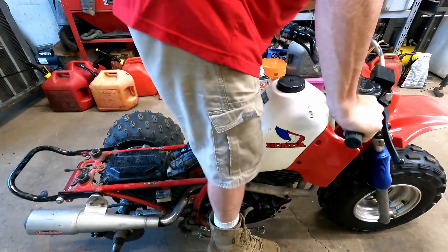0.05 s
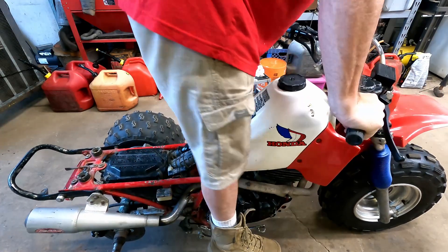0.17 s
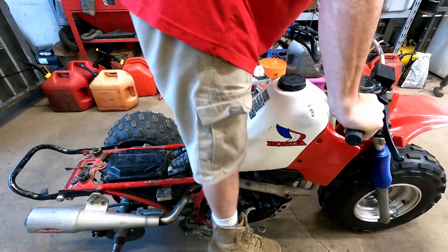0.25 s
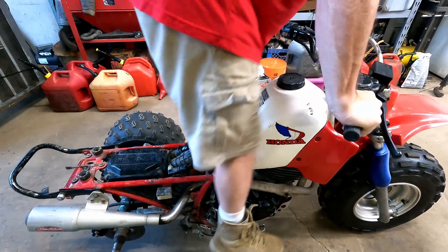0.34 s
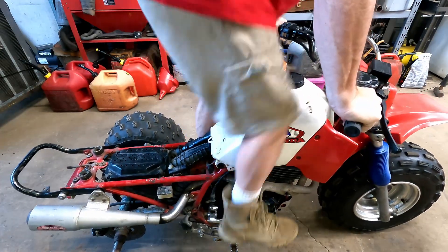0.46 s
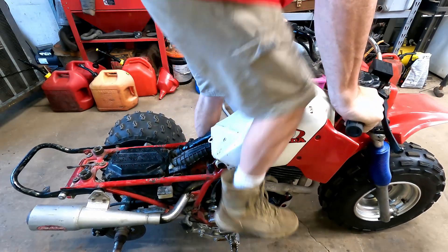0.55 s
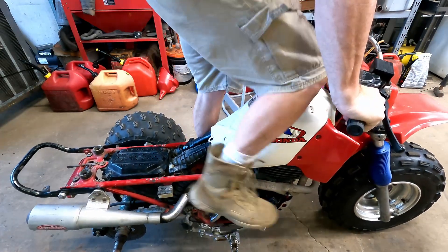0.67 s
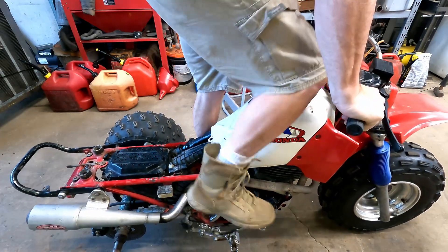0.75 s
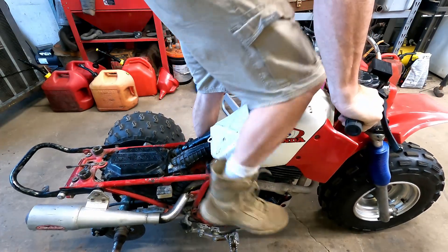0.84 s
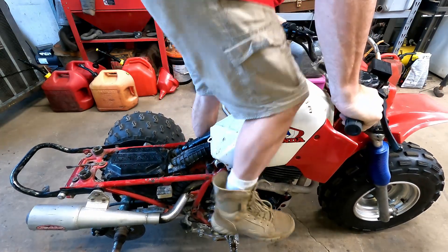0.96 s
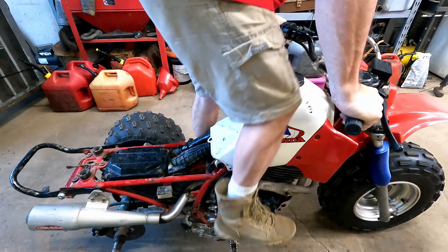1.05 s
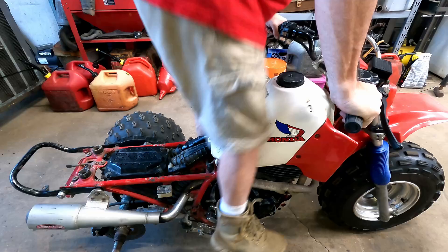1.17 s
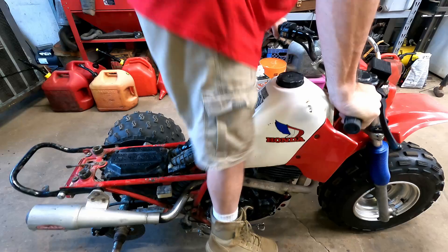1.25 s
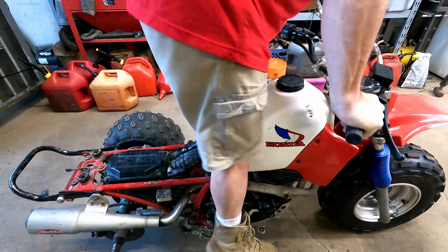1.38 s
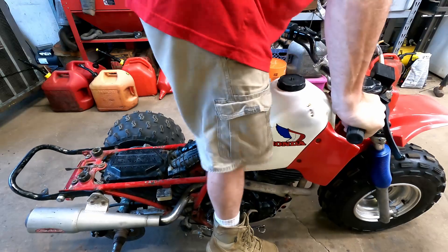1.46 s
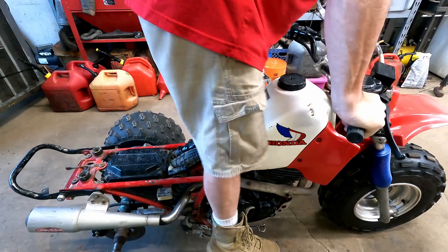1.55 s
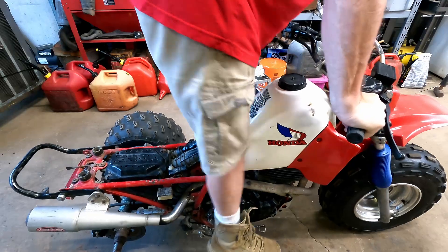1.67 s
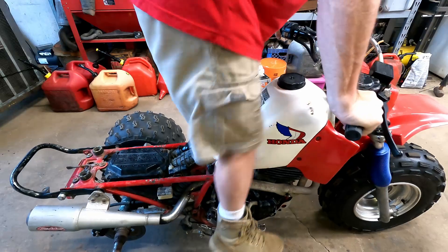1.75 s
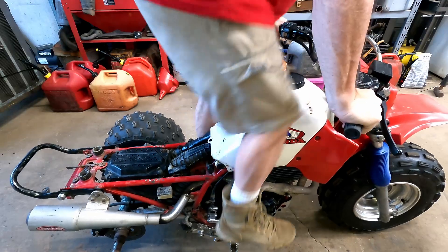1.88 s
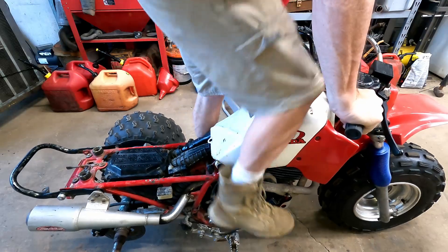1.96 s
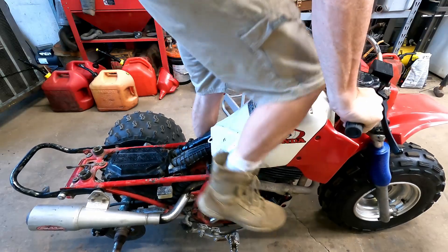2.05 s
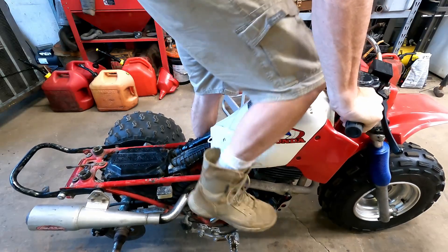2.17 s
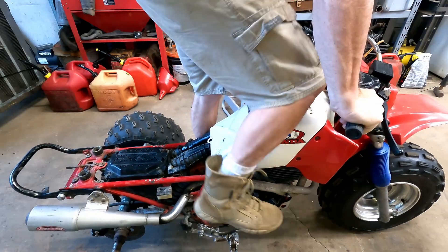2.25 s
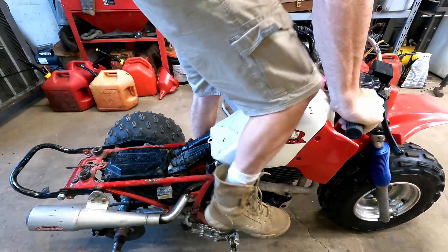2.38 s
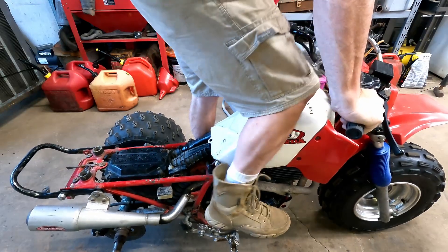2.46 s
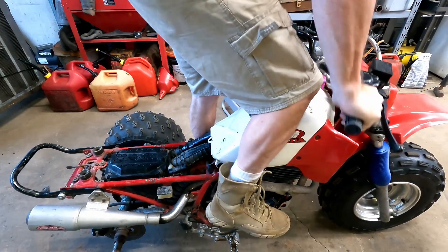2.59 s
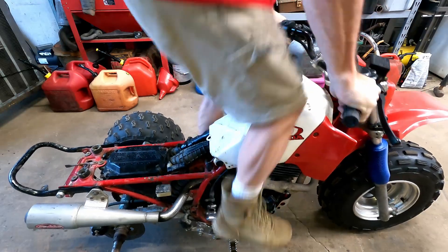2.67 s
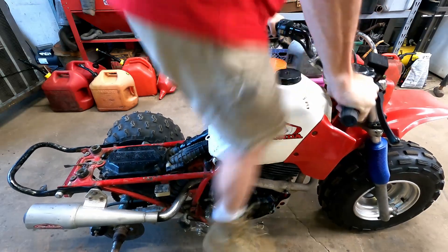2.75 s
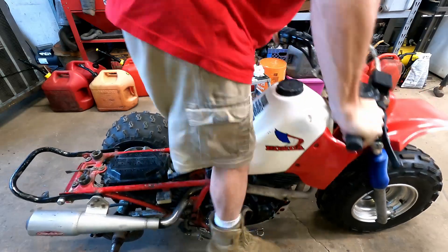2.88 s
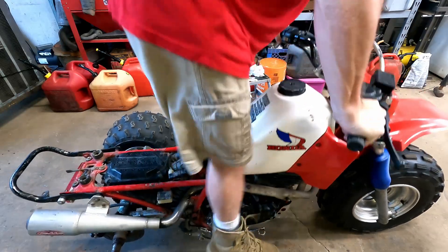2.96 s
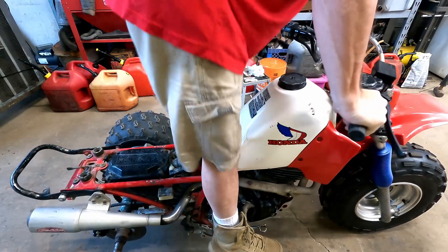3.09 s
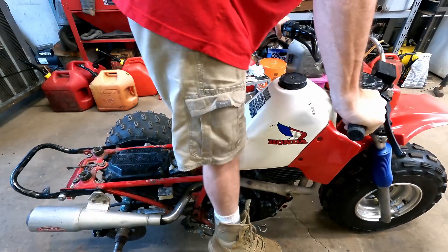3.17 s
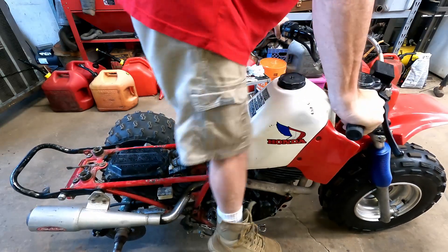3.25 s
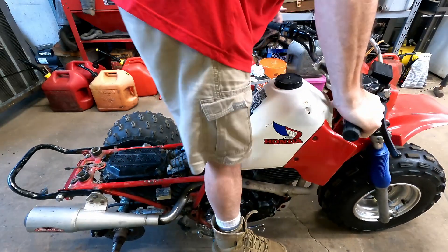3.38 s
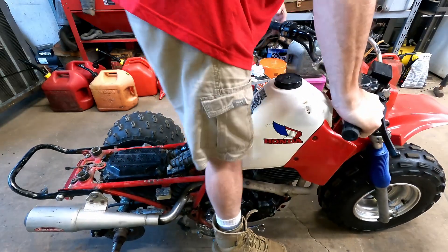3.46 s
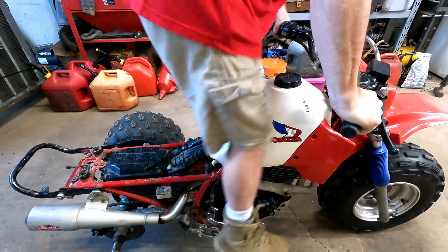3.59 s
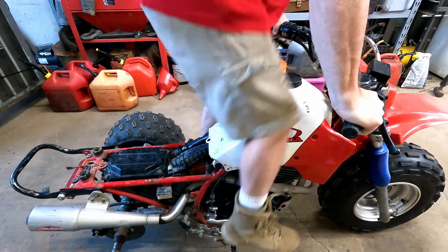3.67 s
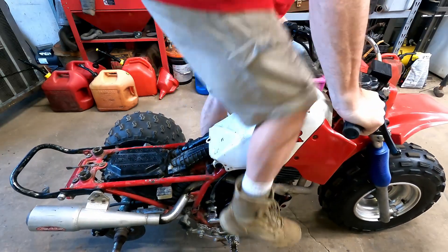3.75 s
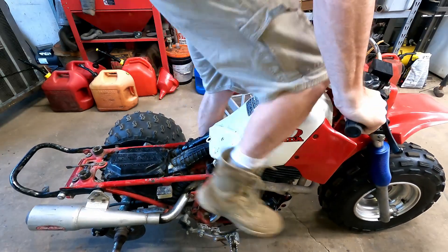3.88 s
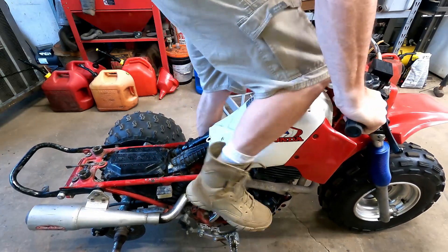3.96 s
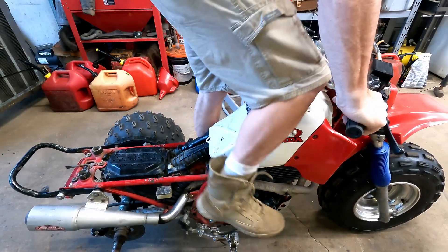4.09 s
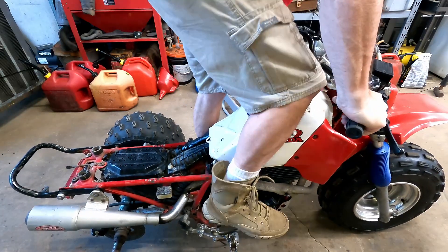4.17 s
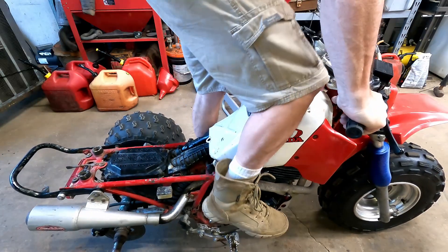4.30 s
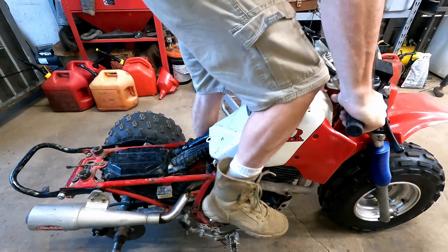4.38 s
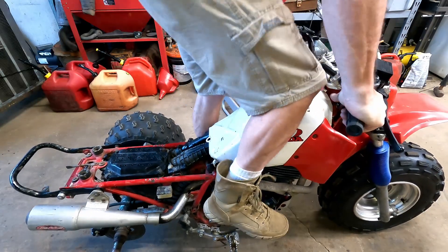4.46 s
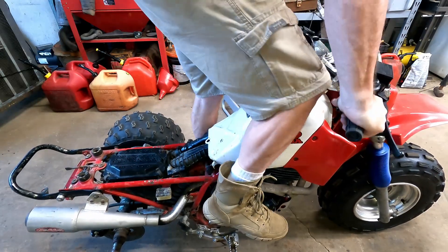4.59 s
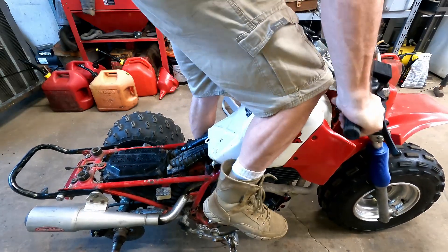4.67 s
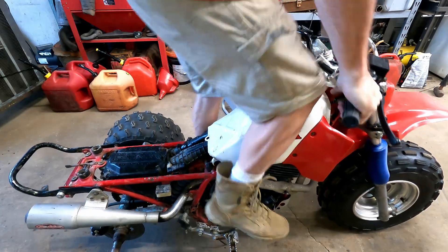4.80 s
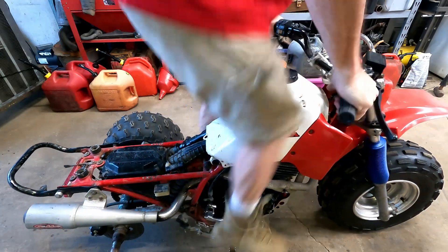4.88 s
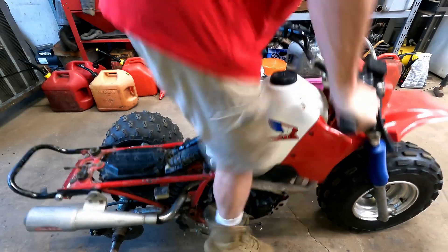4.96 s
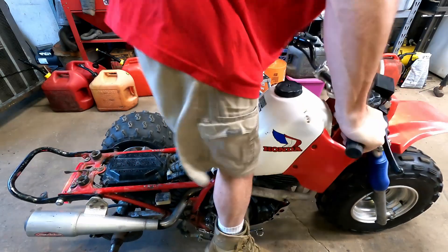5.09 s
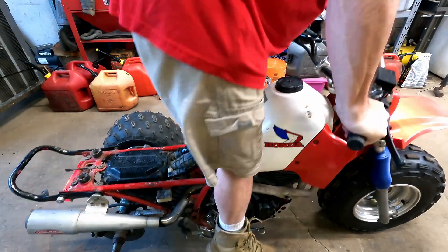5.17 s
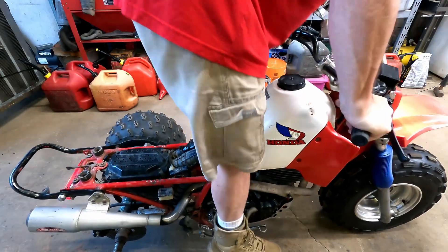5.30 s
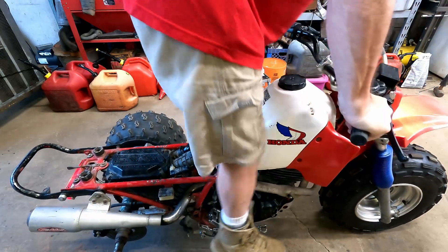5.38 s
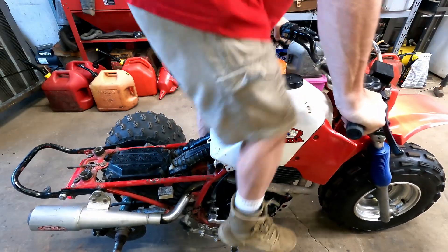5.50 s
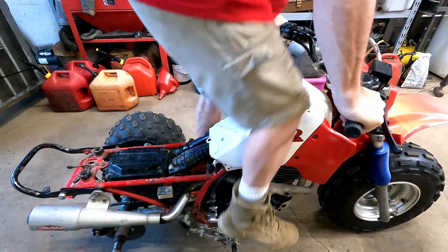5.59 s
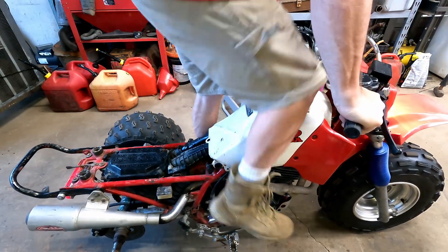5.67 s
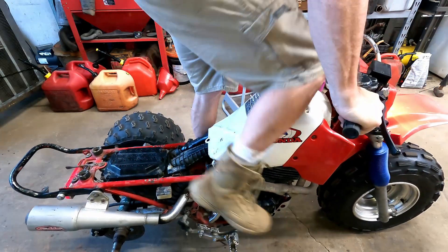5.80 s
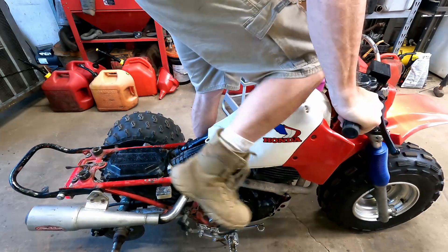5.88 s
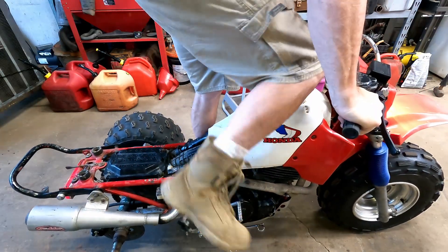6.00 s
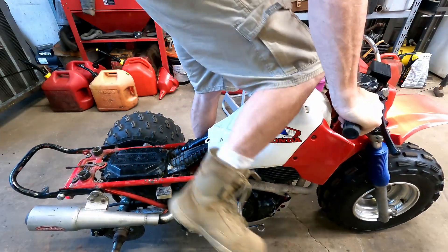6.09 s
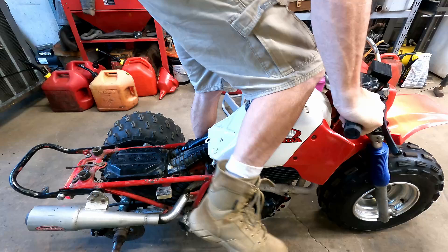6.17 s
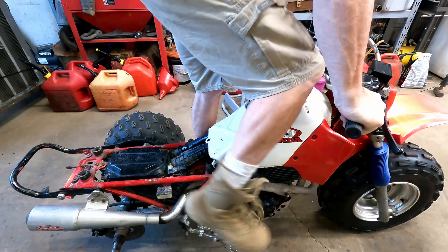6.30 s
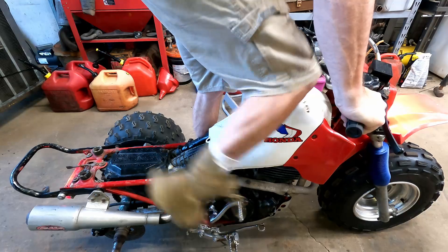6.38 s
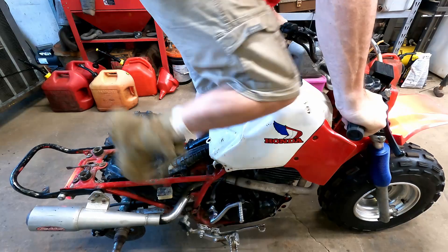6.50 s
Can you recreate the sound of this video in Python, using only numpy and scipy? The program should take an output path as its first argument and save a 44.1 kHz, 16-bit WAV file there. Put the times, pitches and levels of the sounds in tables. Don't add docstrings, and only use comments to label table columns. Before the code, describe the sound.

Close up in a hard, echoing shop, a kick lever clicks back over its ratchet, clanks under a boot and whirrs the gears. Two kicks give only dull air gulps and sharp metal smacks. A bird whistles faintly outside. The third kick smacks, coughs and catches, and the single-cylinder exhaust pops in a quick, booming, raspy beat to the end.

```python
import sys
import numpy as np
from scipy import signal
from scipy.fft import rfft, irfft, next_fast_len
from scipy.io import wavfile
from scipy.ndimage import uniform_filter1d

SR = 44100
rng = np.random.default_rng(int(sys.argv[2]) if len(sys.argv) > 2 else 0)


def unload_wav(signal):
    wavfile.write(
        sys.argv[1],
        SR,
        np.round(np.clip(np.atleast_2d(signal).T, -1, 1) * 32767).astype(np.int16),
    )


def attenuation_scalar(level_db):
    decades = np.asarray(level_db, float) / 20
    return 10 ** decades


N = 288444

# start in seconds, boom in dB, pulse width in ms.
GULPS = [
    (1.181, -8.5, 2.2),
    (2.712, -13, 2.2),
    (2.7473, 5.5, 1.5),
    (4.863, -13, 2.2),
    (4.8984, 5.5, 1.5),
    (5.1039, 3, 1.5),
    (5.1856, -2.5, 1.7),
]
FIRING_S = [5.0331, 5.2856, 5.3945, 5.5012, 5.6183, 5.7298, 5.8491, 5.9637, 6.0693, 6.1718, 6.2635, 6.3505,
            6.4341, 6.5135]
# pitch in Hz, level in dB, time to die by 60 dB in seconds.
PAWL = [(7000, -3, .006), (7680, -2, .009), (8500, -1, .006), (9000, -2, .007), (9700, -3, .006),
        (10600, -5, .005), (11700, -8, .007)]
# frequency in Hz, level in dB per Hz.
GEARS = [(180, -13.5), (300, 3), (360, -3.5), (440, -1.5), (614, -20.5), (689, -12), (1610, -16.5),
         (2140, -18), (2930, -18), (9240, -14.5), (16000, -25)]
# time in seconds, level in dB.
LOAD = [(4.8, -53), (4.9, -25), (5.3, -27), (5.9, -31.5), (6.3, -23), (6.54, -27.5)]


def rms_one(x):
    return x / np.sqrt(np.mean(x ** 2) + 1e-20)


def at_hz(points, hz):
    table = np.array(points)
    return np.interp(np.log(hz + 1), np.log(table[:, 0]), table[:, 1])


def in_time(rows, column):
    return np.interp(np.arange(N) / SR, np.array(rows)[:, 0], np.array(rows)[:, column])


def level(rows):
    start, end = rows[0][0], rows[-1][0]
    inside = np.interp(np.arange(N) / SR, [start - .01, start, end, end + .01], [0, 1, 1, 0])
    return inside * attenuation_scalar(in_time(rows, column=-1))


def coloured(x, points):
    size = next_fast_len(N)
    return irfft(rfft(x, size) * attenuation_scalar(at_hz(points, np.fft.rfftfreq(size, 1 / SR))), size)[:N]


def band(x, low_hz, high_hz):
    return signal.sosfilt(signal.butter(2, [low_hz, high_hz], "band", fs=SR, output="sos"), x)


def clicks(times, gains):
    out = np.full(N, 1e-18)
    np.add.at(out, np.minimum((np.asarray(times) * SR).astype(int), N - 1), gains)
    return out


def dying(x, t60, rise_ms=0.0):
    keep = np.exp(-1000 / (rise_ms * SR + 1e-9))
    decay = signal.lfilter([1], [1, -attenuation_scalar(-60 / (t60 * SR))], x)
    return signal.lfilter([1 - keep], [1, -keep], decay)


def ring(x, hz, t60):
    r, w = attenuation_scalar(-60 / (t60 * SR)), 2 * np.pi * hz / SR
    return signal.lfilter([0, np.sin(w)], [1, -2 * r * np.cos(w), r * r], x)


def struck(times, db, modes, contact_t60):
    own_db = rng.normal(0, 4, (len(times), len(modes)))
    rattle = rng.standard_normal(N)
    total = 0
    for k, (hz, mode_db, t60) in enumerate(modes):
        contact = dying(clicks(times, attenuation_scalar(db + mode_db + own_db[:, k])), contact_t60, rise_ms=0.2)
        total = total + ring(rattle * contact, hz, t60)
    return total


def pulses(times, gains, widths_ms):
    out, ms = np.zeros(N + 800), np.arange(-400, 400) * 1000 / SR
    for s, gain, width in zip(times, gains, widths_ms):
        out[round(s * SR):round(s * SR) + 800] += gain / width * np.exp(-.5 * (ms / width) ** 2)
    return out[400:N + 400]


def firings():
    throttle_s = (5.85, 6.21)
    s = np.array(FIRING_S)
    throttle, first = np.interp(s, throttle_s, [0, 1]), s == s[0]
    boom_db = 4.5 * first
    width_ms = .72 + (.6 - .72) * throttle
    rasp_db = -28 + (-18.5 + 28) * throttle + 9.5 * first
    crack_db = -17.5 + 0.5 * np.sin(np.pi * throttle) + 5.5 * first
    return s, boom_db, width_ms, rasp_db, crack_db


def pipe(gas):
    # delay in ms, gain.
    bounces = [(0, .375), (1.5, .08), (7.2, .14), (11.5, -.41), (13.5, -.19), (17.1, .19), (22.2, .19),
               (31.8, -.1), (37.7, .17), (52.8, .06), (63.5, .06)]
    # pitch in Hz, level in dB, time to die by 60 dB in seconds, push or pull (1 or -1).
    booms = [(56, -16.7, .142, -1), (72, -25.6, .144, -1), (65, -13.8, .048, 1)]
    taps = clicks([ms / 1000 for ms, gain in bounces], [gain for ms, gain in bounces])[:4000]
    direct = signal.fftconvolve(gas, taps)[:N]
    low = sum(sign * attenuation_scalar(db) * ring(gas, hz, t60) for hz, db, t60, sign in booms)
    return direct + low * attenuation_scalar(-20)


def exhaust_boom():
    s, boom_db, width_ms, _, _ = firings()
    gulp_s, gulp_db, gulp_ms = np.transpose(GULPS)
    pushed = pulses(s, -attenuation_scalar(boom_db), width_ms)
    pulled = pulses(gulp_s, attenuation_scalar(gulp_db), gulp_ms)
    return attenuation_scalar(.5) * pipe(pushed + pulled)


def silencer_rasp():
    # pitch in Hz, level in dB, time to die by 60 dB in seconds.
    chambers = [(297.3, 0.5, .13), (263.5, -4.5, 0.17), (416, -4, 0.087), (174, -10.5, 0.16),
                (140, -15.5, 0.07), (347, -7, 0.12), (520, -1, 0.068)]
    # delay after the stroke in seconds, level over the rasp in dB.
    baffles = [
        (0, 0),
        (.0165, -3),
        (.028, 1),
    ]
    s, _, width_ms, rasp_db, _ = firings()
    returning = pulses(s + 0.00924, -attenuation_scalar(rasp_db - 30), width_ms)
    rasp = sum(attenuation_scalar(db) * ring(returning, hz, t60) for hz, db, t60 in chambers)
    slaps = sum(pulses(np.minimum(s + lag, N / SR), -attenuation_scalar(rasp_db + db), width_ms) for lag, db in baffles)
    return rasp + slaps


def exhaust_jet():
    s, _, _, _, crack_db = firings()
    opens_s = s - .003
    jet = dying(clicks(opens_s, attenuation_scalar(crack_db + 4)), .045, rise_ms=1.2)
    jet = jet + dying(clicks(opens_s, attenuation_scalar(crack_db - 6.5)), .3)
    hiss = rms_one(coloured(rng.standard_normal(N), GEARS))
    return jet * (hiss + attenuation_scalar(-24) * ring(hiss, 2500, .008))


def blows():
    # start in seconds, brightness in dB.
    pawl_drops = [(0.4114, 4.5), (0.4785, 8), (0.538, 5.5), (0.596, 9), (1.8188, 8), (1.8944, 7.5),
                  (1.9583, 9), (2.023, 3.5), (3.6716, 11.5), (3.737, 8.5), (3.7966, 11), (3.8533, 11.5)]
    # start in seconds, level in dB.
    top_stops = [
        (0.669, -15),
        (0.6917, -23.5),
        (2.0887, -16.5),
        (3.8863, -15),
    ]
    # start in seconds, level in dB, brightness in dB, weight in dB.
    boot = [(0.8514, -35.5, -11, 4), (0.8993, -27.5, -1, -15), (0.9283, -21, 9.5, -2),
            (2.311, -31, -7, -19), (2.3716, -36, -6, -6), (2.395, -28, 6, -1), (3.5685, -40.5, -13, -8.5),
            (3.6322, -54, 0, 16), (4.074, -40, -2, -7), (4.1745, -41, -17, 0), (4.4223, -35, 1.5, 0)]
    # start in seconds, level, brightness, weight in dB.
    kick_clanks = [(1.2498, -24, -30, -2), (1.2666, -27, 4.5, 8.5), (1.333, -21.5, 5, -23),
                   (1.4329, -21, 9, -7), (1.5277, -31.5, 3, 6), (2.7444, -22.5, -1.5, 11),
                   (2.7758, -20.5, -10, -5.5), (2.7813, -25, 4, 6.5), (2.8104, -36, 12, -23),
                   (2.8326, -28.5, 1.5, -2), (2.88, -26.5, 4, 9.5), (2.9038, -18, -13, -1),
                   (3.0562, -28.5, 6, -1), (3.1652, -42.5, -8, -8.5), (4.751, -59, 13.5, 9),
                   (4.8084, -39, 3, 0), (4.9163, -27.5, -11, 16), (4.9434, -17.5, 10.5, -14),
                   (5.0057, -26.5, -2, 9), (5.7274, -27, 13.5, -44)]
    # pitch in Hz, level in dB, time to die by 60 dB in seconds.
    case_modes = [(1250, -4, .016), (1660, -1, .018), (1850, -3, .016), (2150, -4, .012), (2500, -3, .011),
                  (2870, -3, .011), (3500, -7, .009), (4400, -6, .008), (5400, -6, .007)]
    rows = [(s, -23, bright_db, -10.5) for s, bright_db in pawl_drops]
    rows += [(s, db, -2, -17) for s, db in top_stops]
    s, case_db, brightness_db, weight_db = np.transpose(sorted(rows + boot + kick_clanks))
    clunk_db, bright_db = case_db + weight_db, case_db + brightness_db
    tick_db = case_db + 10.5 + 0.5 * brightness_db
    noise = rng.standard_normal((4, N))
    clunk = band(noise[0] * dying(clicks(s, attenuation_scalar(clunk_db + 13.5)), 0.12, rise_ms=1.1), 139, 647)
    case = struck(s, case_db - 22, case_modes, 0.036)
    crunch = band(noise[1] * dying(clicks(s, attenuation_scalar(case_db + 15.5)), 0.058, rise_ms=1.8), 1110, 3160)
    pawl = struck(s, bright_db - 21.5, PAWL, 0.061)
    snap = band(noise[2] * dying(clicks(s, attenuation_scalar(bright_db + 10)), 0.039, rise_ms=2.1), 6800, 9760)
    tick = band(noise[3] * dying(clicks(s, attenuation_scalar(tick_db)), 0.054, rise_ms=1.3), 3880, 6150)
    return clunk + case + crunch + pawl + snap + tick


def slams():
    # start in seconds, level in dB.
    smacks = [
        (2.7835, 1.5),
        (4.9450, -2.5),
        (5.9, -21.5),
        (2.8800, -10.5),
        (3.0580, -38),
    ]
    s, db = np.transpose(smacks)
    hit = dying(clicks(s, attenuation_scalar(db + 9.0)), 0.011, rise_ms=0.36)
    return band(rng.standard_normal(N) * hit, 6200, 11800)


def ratchet():
    # time in seconds, teeth passed so far.
    teeth = [(5.076, 0), (5.126, 4), (5.235, 11), (5.363, 18), (5.538, 29), (5.635, 34), (5.732, 40),
             (5.789, 45)]
    # time in seconds, buzz level in dB.
    buzz = [(5.06, -20.5), (5.09, -29.5), (5.6, -25.5), (5.728, -23), (5.8, -34.5)]
    tooth_s, count = np.transpose(teeth)
    s = np.interp(np.arange(teeth[-1][1] + 1), count, tooth_s) - .004
    db = rng.normal(0, 2, len(s))
    burst = dying(clicks(s, attenuation_scalar(db)), 0.062, rise_ms=0.63)
    crack = band(rng.standard_normal(N) * burst, 1300, 11100)
    rings = struck(s, db - 21, PAWL, .04)
    return level(buzz) * attenuation_scalar(-5.5) * rms_one(crack + rings)


def thumps():
    # start in seconds, peak in dB, pitch in Hz, time to die by 60 dB in seconds.
    knocks = [(0.001, -18, 115.4, 0.22), (0.002, -21.5, 178, 0.12), (0.004, -17, 277, 0.11),
              (1.252, -10, 493, 0.088), (1.266, -8.5, 590, 0.086), (1.53, -21.5, 178, 0.15),
              (2.402, -18, 476, .09), (2.887, -6, 106, 0.11), (2.896, -10.5, 114.5, .3),
              (2.93, -21.5, 185, 0.32), (3.07, -20, 181, 0.21), (3.30, -40.5, 55, 0.13)]
    jolts = dying(clicks(FIRING_S + [s for s, db, ms in GULPS], 1), .16, rise_ms=5.8)
    noise = rng.standard_normal(N)
    shudder = rms_one(band(band(noise, 59.5, 450), 55, 460))
    shake = level(LOAD) * attenuation_scalar(4.5) * (.12 + jolts) * shudder
    modes = 0
    for s, db, hz, t60 in knocks:
        soft_hit = signal.lfilter([.02], [1, -.98], clicks([s], attenuation_scalar(db)))
        modes = modes + ring(soft_hit, hz, t60)
    return shake + modes * (1 + .6 * rms_one(band(noise, 12.4, 62)))


def spins():
    # fastest at, fades from and silent from, all in seconds.
    moments = [
        (0.0, .08, .4),
        (1.17, 1.3, 1.32),
        (2.705, 3.12, 3.325),
        (4.865, 4.98, 5.0),
        (5.03, 5.12, 5.2),
    ]
    # peak in dB, coasting level in dB.
    strengths = [(-21.5, -28), (-26.5, -32.5), (-23.5, -30.5), (-28, -30.5), (-26, -36)]
    curves = []
    for (s, slows, stops), (peak_db, coast_db) in zip(moments, strengths):
        end_db = coast_db - 75.5 * (stops - slows)
        curves.append([(s - .085, peak_db - 33), (s, peak_db), (s + .07, coast_db),
                       (slows, coast_db), (stops, end_db)])
    return curves


def whirr():
    spin_bright_db = [-1, -7, -9.5, -7, -15]
    grit = rng.standard_normal(N) * attenuation_scalar(2.0 * np.minimum(rng.exponential(1, N), 4))
    noise = rms_one(band(coloured(grit, GEARS), 550, 18000))
    bright = band(noise, 2900, 22000)
    total = 0
    for rows, db in zip(spins(), spin_bright_db):
        faster_db = in_time(rows, column=1) + 25.5
        total = total + level(rows) * (noise + (attenuation_scalar(db + 0.78 * faster_db) - 1) * bright)
    running = [(s, -28 + 0.58 * (db + 27)) for s, db in LOAD]
    return total + level(running) * (noise + (attenuation_scalar(-12) - 1) * bright)


def bird():
    # time after its start in seconds, pitch in Hz, level in dB.
    slur = [(0, 4090, -49), (.031, 3840, -49.5), (.066, 3715, -52), (.11, 3750, -56), (.245, 3850, -70)]
    slur_s, slur_db = (3.556, 4.205), (1.5, 4.5)
    # time in seconds, pitch in Hz, level in dB.
    lead_in = [
        (3.408, 3700, -60),
        (3.425, 3250, -49),
        (3.437, 3250, -62),
        (3.445, 4050, -54),
        (3.47, 4450, -56),
        (3.5, 4620, -57),
        (3.53, 4450, -56),
    ]
    flutter = rms_one(band(rng.standard_normal(N), 11, 90))
    first, second = ([(start + s, hz, db + effort_db) for s, hz, db in slur]
                     for start, effort_db in zip(slur_s, slur_db))
    song = 0
    for rows in (lead_in + first, second):
        phase = 2 * np.pi * np.cumsum(in_time(rows, column=1)) / SR
        song = song + level(rows) * attenuation_scalar(4.3 * flutter) * np.sin(phase)
    return song


def shop(x):
    # frequency in Hz, time to die by 60 dB in seconds.
    room_t60 = [(100, 0.48), (400, 0.89), (1500, 0.58), (5000, 0.64), (10000, 0.4), (16000, 0.129)]
    t, edges = np.arange(SR) / SR, 44 * 2 ** np.arange(0, 9, .5)
    white = rng.standard_normal((2, SR))
    tail = 0
    for k, (low, high) in enumerate(zip(edges, edges[1:])):
        tail = tail + band(white[k % 2], low, min(high, 20000)) * attenuation_scalar(-60 * t / at_hz(room_t60, low))
    tones = rfft(tail * (1 - np.exp(-t / 0.0081)))
    power = abs(tones) ** 2
    even = np.sqrt(uniform_filter1d(power, size=400) / uniform_filter1d(power, size=30))
    tail = irfft(tones * even, SR) * np.clip(10 * (1 - t) - 1, 0, 1)
    tail = tail / np.sqrt(np.sum(tail ** 2))
    before = np.arange(N) < 3.328 * SR
    wet = signal.fftconvolve([x * before, x * ~before], [tail], axes=1)[:, :N]
    return wet[0] * before + wet[1]


def air():
    # frequency in Hz, level in dB per Hz.
    air_colour = [(12, -34.5), (20, 12.5), (60, 21.5), (93, -42), (172, -16), (210, -15.5), (347, -16.5),
                  (1710, -18), (2260, -27), (2750, -19), (16000, -32)]
    rumble = rms_one(band(rng.standard_normal(N), 5.5, 96))
    high_pass = signal.butter(2, 150, "high", fs=SR, output="sos")
    hiss = signal.sosfilt(high_pass, rms_one(coloured(rng.standard_normal(N), air_colour)))
    keep = np.exp(-1 / (0.029 * SR))
    shaken = signal.lfilter([1 - keep], [1, -keep], sum(level(rows) for rows in spins()[1:]))
    return attenuation_scalar(-37) * hiss + (attenuation_scalar(-45) + attenuation_scalar(-4.5) * shaken) * rumble


def scene():
    # frequency in Hz, level against the common sound in dB.
    side_colour = [(60, -52.5), (180, -54), (550, -40), (1650, -42.5), (4970, -41), (15000, -32.5)]
    boom, rasp, jet = exhaust_boom(), silencer_rasp(), exhaust_jet()
    metal, knock, song = blows() + slams() + ratchet(), thumps(), bird()
    send = attenuation_scalar(-5.5) * metal + attenuation_scalar(-8.0) * knock + attenuation_scalar(-6.0) * jet
    send = send + attenuation_scalar(-6) * rasp + attenuation_scalar(-16) * boom + attenuation_scalar(-7) * song
    mid = metal + knock + rasp + boom + jet + song + whirr() + air() + shop(send)
    smear = rng.standard_normal(2000) * np.exp(-np.arange(2000) / 400)
    smeared = signal.fftconvolve(mid, smear / np.linalg.norm(smear))[:N]
    flicker_db = np.repeat(rng.normal(0, 15.4, N // 1024 + 1), 1024)[:N]
    side = attenuation_scalar(uniform_filter1d(flicker_db, size=256)) * coloured(smeared, side_colour)
    return np.array([mid + side, mid - side])


def top_cut(x):
    return signal.sosfilt(signal.butter(12, 16180, fs=SR, output="sos"), x)


def record(dry):
    mix = 1.082 * np.tanh(dry / 1.23)
    return top_cut(mix)


dry = scene()
out = record(dry)
unload_wav(out)
```